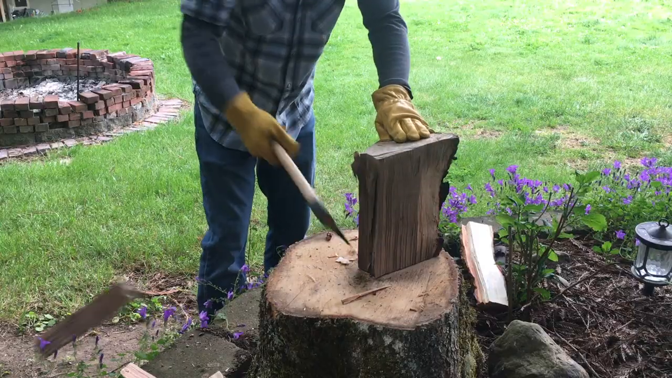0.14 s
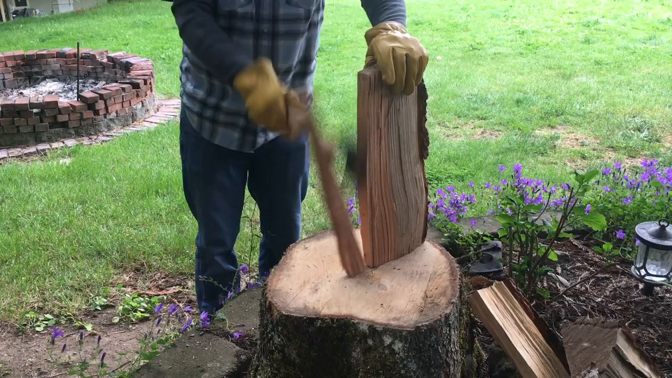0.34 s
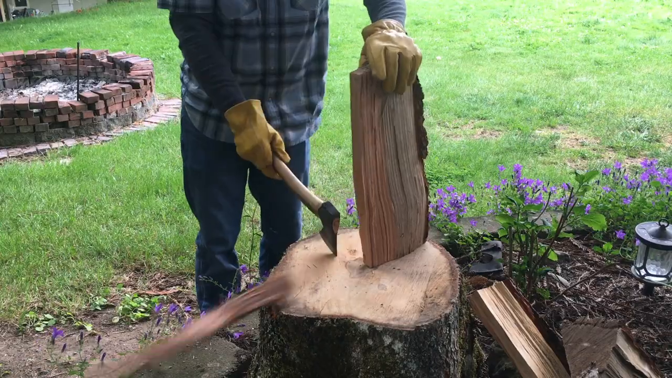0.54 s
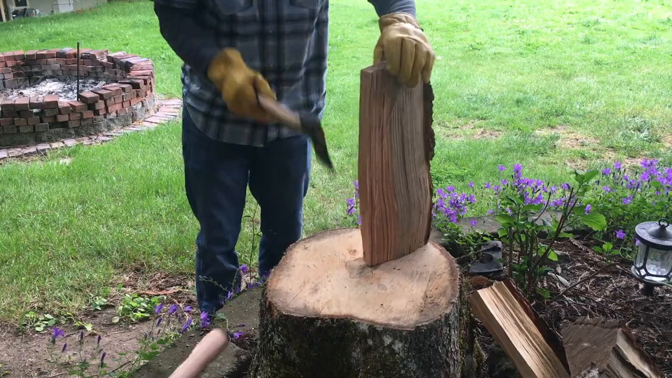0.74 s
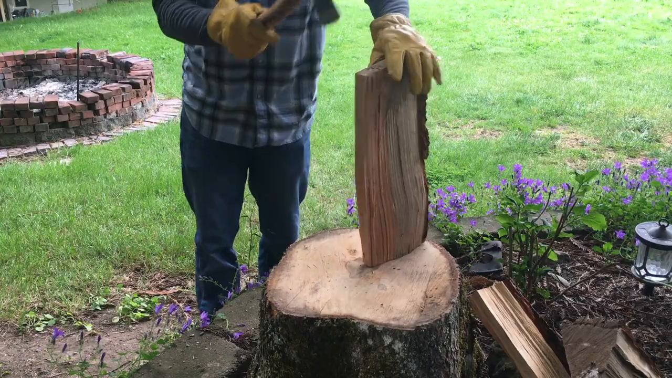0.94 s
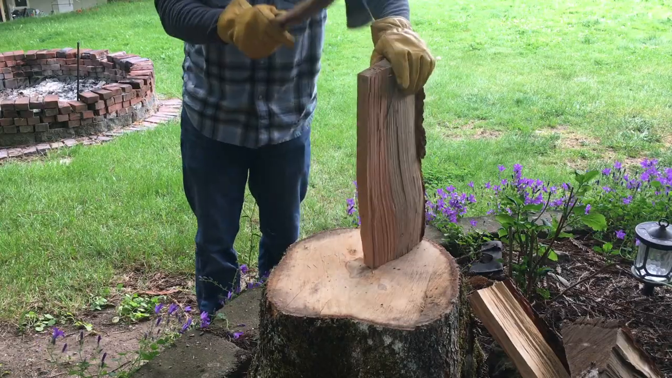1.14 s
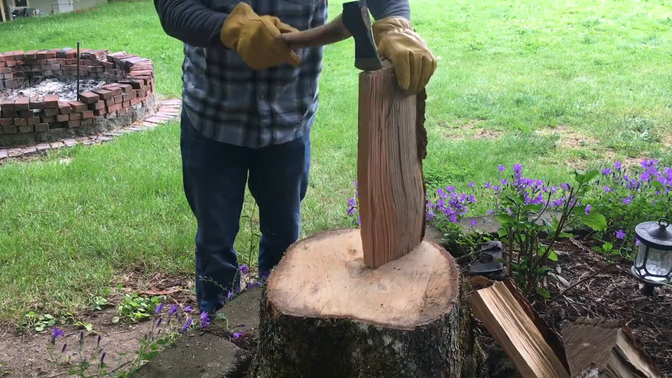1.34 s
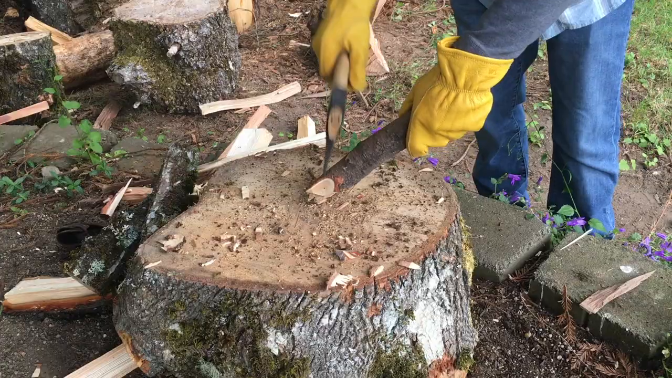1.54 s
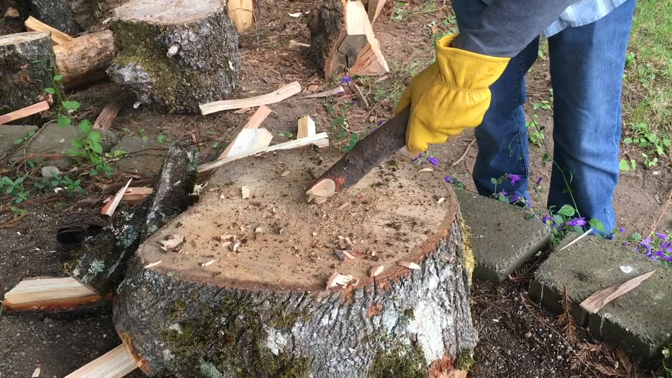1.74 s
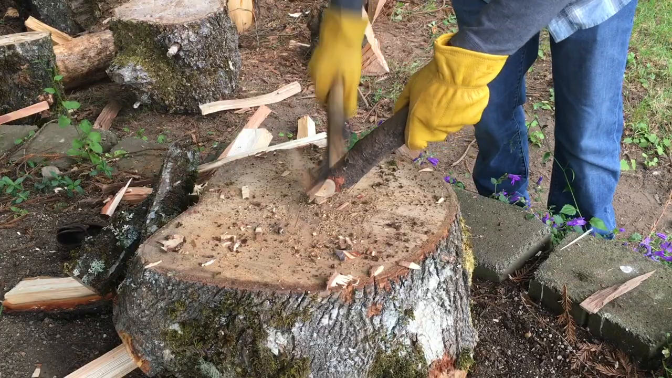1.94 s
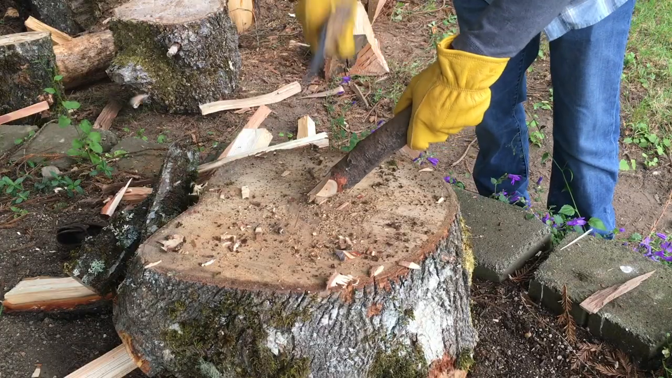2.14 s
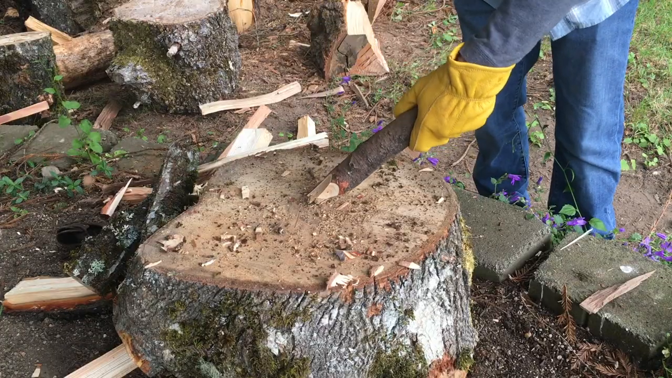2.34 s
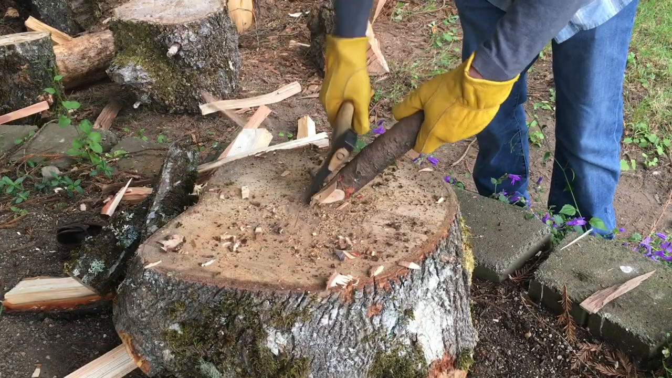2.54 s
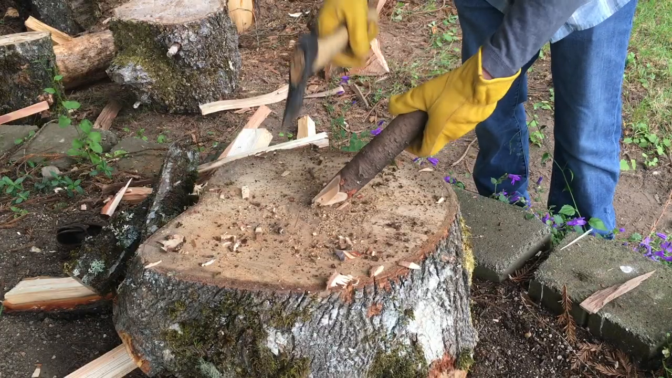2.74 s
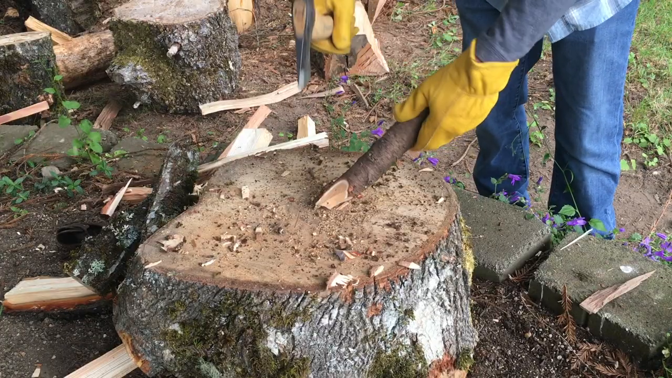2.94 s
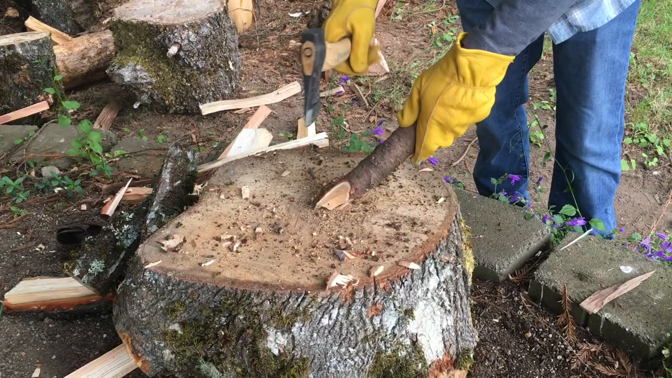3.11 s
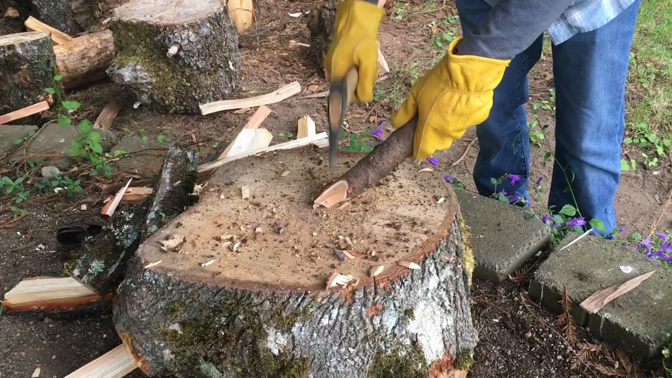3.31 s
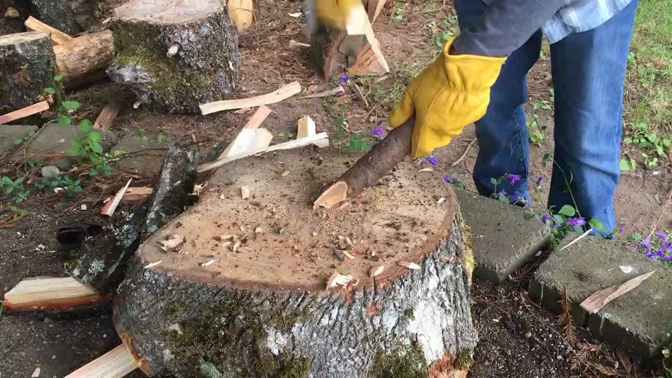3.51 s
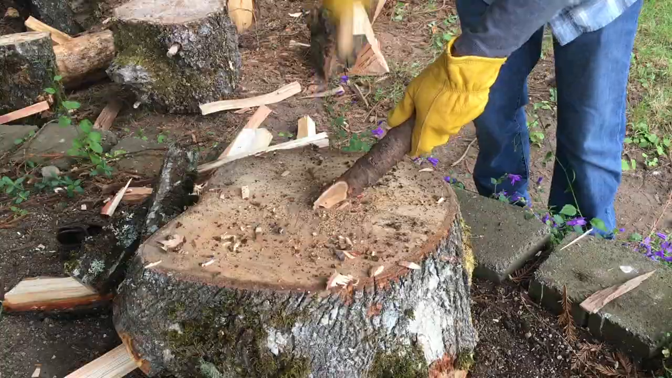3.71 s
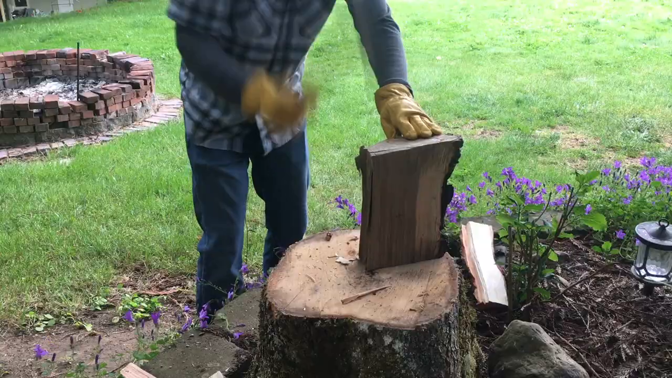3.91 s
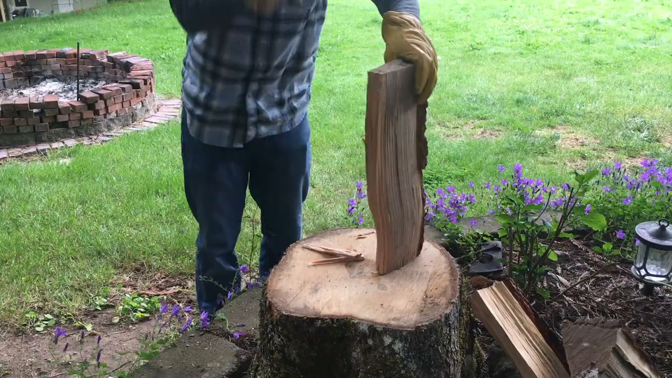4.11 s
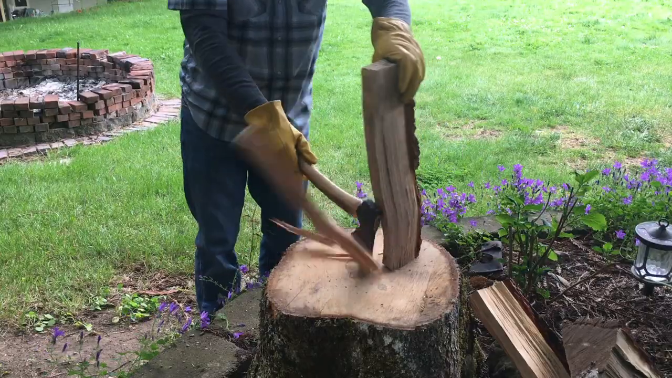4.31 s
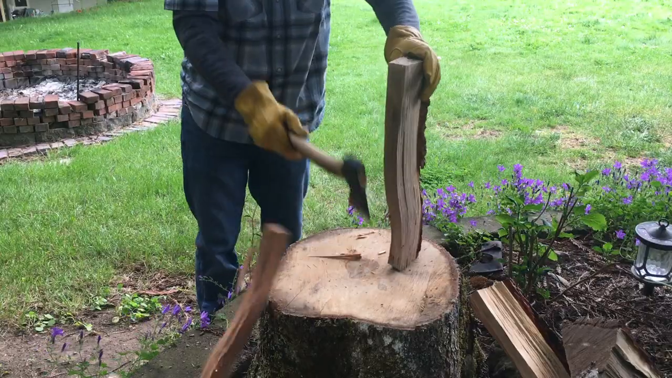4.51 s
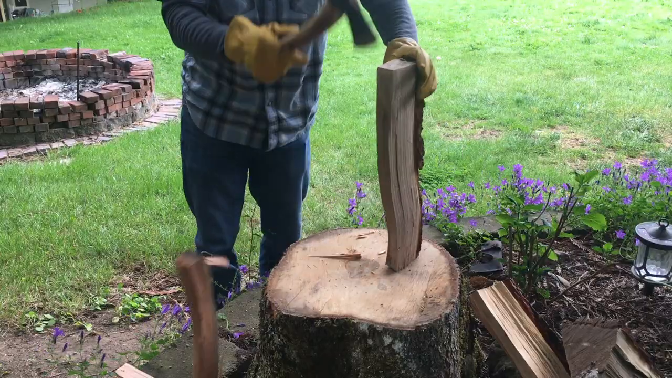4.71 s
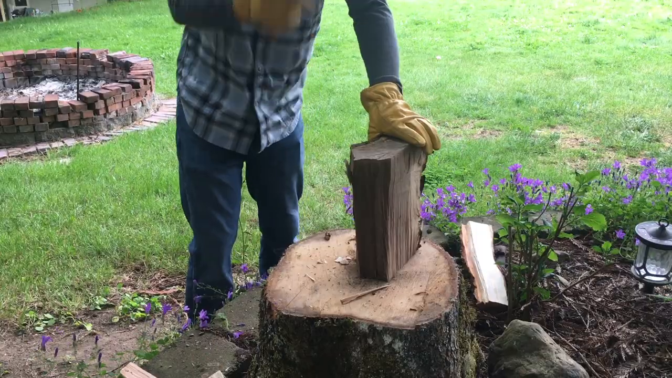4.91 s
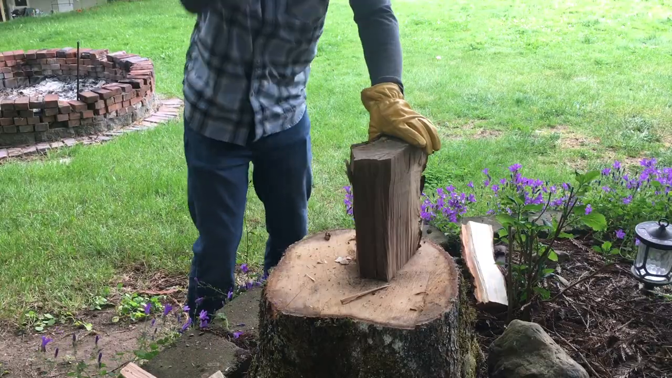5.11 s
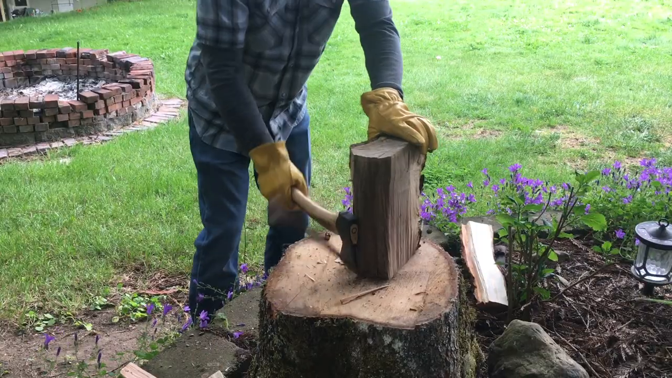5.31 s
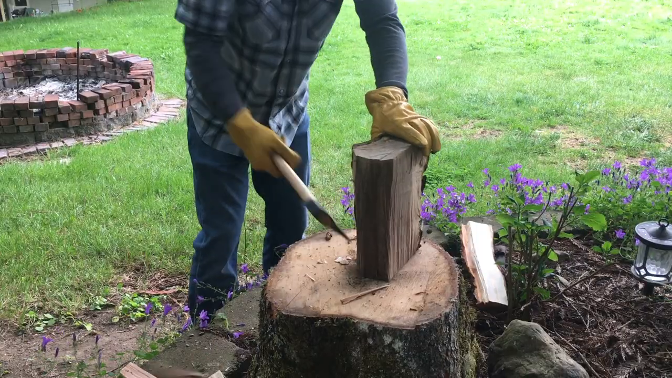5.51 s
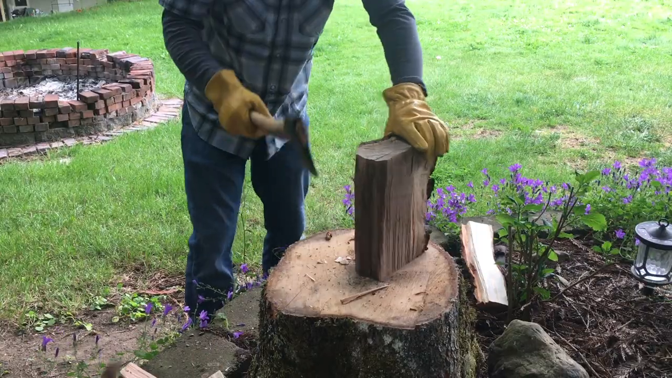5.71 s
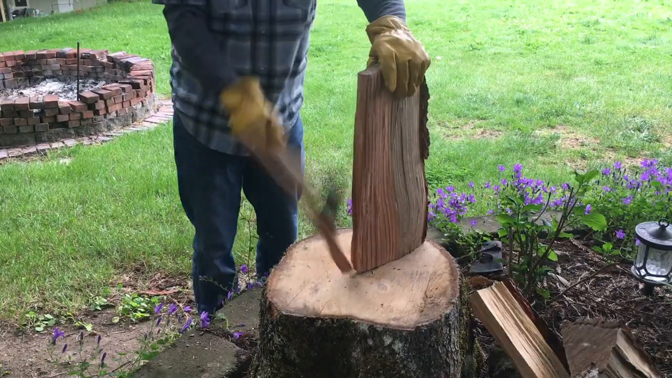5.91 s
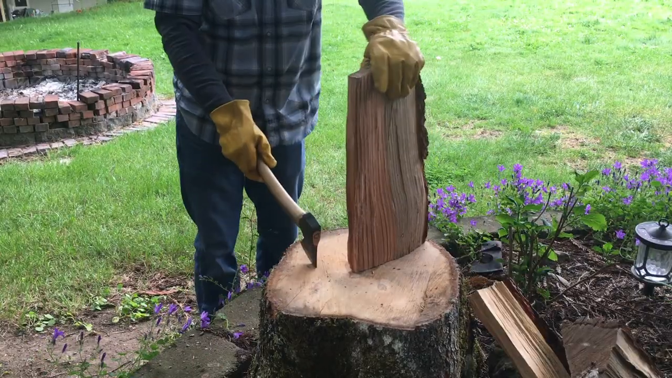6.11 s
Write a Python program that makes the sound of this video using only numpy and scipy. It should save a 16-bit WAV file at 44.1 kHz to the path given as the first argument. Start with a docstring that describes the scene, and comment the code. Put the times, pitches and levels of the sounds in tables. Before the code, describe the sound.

Close outdoors, a hatchet splits kindling on a big stump. A knock and a sharp crack come first, then a split stick bounces woodily. Two tight chops into a branch follow, then quicker splits with clattering sticks, ending on the hardest, brightest crack. Low stump thuds and short yard echoes sit over faint air, distant rumble and a wavering motor hum. One midrange-forward microphone with little deep bass and a softened top.

```python
"""Splitting kindling in a garden

Close by, a hatchet splits kindling on a stump: noise bursts crack and tear, damped sines make the rest,
from the blade's bite and ringing steel to sticks that knock, fall and ring, and the stump's low thuds.
The yard answers the wood with a dying noise echo. Further off lie noise hiss and rumble, a wavering hum
of steady tones, a faint buzz of narrow noise and a bird's two rising whistles, gliding near-sines.
One microphone drops the deep bass, lifts its presence range and cuts the top."""
import sys
import numpy as np
from scipy import signal
from scipy.fft import rfft, irfft
from scipy.io import wavfile
from scipy.ndimage import uniform_filter1d

SR = 44100
rng = np.random.default_rng(int(sys.argv[2]) if len(sys.argv) > 2 else 0)


def store_wav(level_fs):
    """Save 16-bit WAV to argv[1]."""
    pcm = np.round(np.clip(np.atleast_2d(level_fs), -1, 1) * 32767)
    wavfile.write(sys.argv[1], SR, pcm.T.astype(np.int16))


N = 275669

# Fibres snapping, chips and bark scuffing:
# (time [s], hold [ms], fade t60 [ms], level [dB], brightness [dB per band])
CRACKS = [(0.127, 6.1, 10, -39.5, -7.5), (0.193, 3.4, 19, -66.5, -18), (0.4074, 8.1, 14, -20, 7),
          (0.413, 1.2, 81, -28.5, 0.5), (0.497, 5.4, 30, -57.5, -9.5), (0.521, 7.5, 23, -62, -8),
          (0.6997, 12, 64, -32.5, 2.5), (0.918, 27, 6.4, -44.5, -1.5), (0.9268, 2, 28, -31.5, -6),
          (1.066, 3.6, 20, -54, -3), (1.115, 9.5, 18, -52.5, 5), (1.132, 7.5, 6.2, -62, 7),
          (1.15, 2.4, 5, -53, 16), (1.345, 1.3, 25.6, -33.5, -3.5), (1.598, 9, 36, -59.5, 0.5),
          (2.049, 5.2, 9.7, -17.5, 2), (2.061, 1.7, 19, -29, -9), (2.085, 3.7, 46, -47.5, 1.5),
          (2.609, 4.6, 37, -21, 0), (2.622, 4.1, 9.1, -31, -17.5), (2.633, 2.5, 70, -39.5, -7),
          (2.647, 49, 71, -64.5, -14.5), (3.055, 2.6, 16, -58.5, -0.5), (3.089, 3.8, 15, -67, 2.5),
          (3.23, 4.9, 17, -59, 2.5), (3.447, 5.1, 23, -43, 0.5), (3.508, 1.3, 12, -58, -6.5),
          (4.038, 15, 17, -43, -7), (4.0459, 10.7, 48, -28, 4.5), (4.062, 8.1, 29, -39.5, 2),
          (4.077, 0.75, 29, -25.5, -3.5), (4.094, 48, 16, -71, 8.5), (4.288, 5, 19.7, -16, 0.5),
          (4.301, 10.4, 56, -34.5, 2), (4.32, 6.5, 37, -36, 0.5), (4.337, 5, 230, -46, -5),
          (4.368, 2.45, 14, -32.5, 3), (4.542, 3.7, 18, -51.5, -2.5), (4.617, 4, 76, -36.5, -5),
          (4.736, 1.33, 35, -48.5, -4.5), (5.3427, 3.1, 14, -20, 1), (5.349, 12.3, 22, -30.5, 2),
          (5.364, 21, 24, -37, 4), (5.373, 1.2, 10, -40, 1), (5.3805, 2, 20, -37, -4),
          (5.395, 21, 160, -50.5, -4), (5.407, 1.6, 12, -53, 8), (5.574, 4.4, 18, -57, 1),
          (5.622, 33, 12, -54, -1), (5.6404, 5.3, 20, -39.5, 5.5), (5.659, 1.2, 30, -42, 0),
          (5.726, 1.9, 34, -48.5, 4.5), (5.872, 2, 12, -57.5, -5), (5.974, 0.77, 10.3, -10.5, 3.5),
          (5.979, 10.2, 22, -22.5, 0.5), (5.992, 5, 180, -42.5, -3.5), (6.038, 2.3, 19, -29.5, -5),
          (6.222, 22, 37, -54.5, 1)]
# Bands of the cracks, dull to bright: (low edge [Hz], high edge [Hz])
CRACK_BANDS_HZ = [(400, 1500), (1500, 3500), (3500, 7400)]
MIDDLE_DB = -3.5   # middle band against the line from dull to bright

# All blow tables below, from bites to jumps: (time [s], main ring [Hz], peak [dB],
# brightness [dB per octave], focus on the main ring [dB per octave squared], ring length [share of usual])
# All ring tables beside them: (multiple of main ring [ratio], relative level [dB], usual t60 [s])
# The blade bites the piece being split
BITES = [(0.41, 563, -28.5, 5, -1, 1), (2.05, 431, -40, 15, 4.5, 0.67),
         (2.612, 540, -32, -12.5, -4.5, 0.77), (3.449, 631.5, -42, -17, 5, 0.7),
         (4.049, 486.6, -24, -2, -4, 0.89), (4.29, 574, -30, -7, -5.5, 0.81),
         (5.344, 685, -28.5, 4.5, -3, 0.38), (5.985, 530, -31.5, -24.5, 4, 0.59)]
BLOCK_RINGS = [(0.501, -5, 0.059), (0.998, 7, 0.063), (1.32, -11, 0.044), (2.099, -0.5, 0.046),
               (2.95, 6.5, 0.021), (3.9, -11, .025)]
# Blade or wood comes down on the stump's face
LANDINGS = [(0.1277, 880, -11, -1.5, 3.1, 0.3), (0.498, 940, -25.5, -3.5, 0.43, 0.65),
            (0.7015, 1107, -36, -13.5, 0.37, 0.67), (0.927, 1510, -9, 12, 0.59, 0.067),
            (1.122, 492, -55, -12.5, 0.27, 1.9), (1.346, 947, -34.5, -2.5, 0.27, 1.54),
            (1.602, 1100, -52, -12, 0.38, 0.67), (2.064, 838, -26.5, 10, 3, 1.3),
            (2.086, 1110, -29, -1, .3, 0.62), (2.6225, 1460, -10, -1, 2.7, 0.32),
            (2.6335, 1187, -20.5, 3.5, 3.1, 0.97), (4.078, 1297, -20, 6.5, 0.26, 1.14),
            (4.364, 890, -22, -4.5, 0.24, 0.67), (4.736, 1364, -37, -3, 0.3, 0.88),
            (5.388, 1134, -18, 2, .3, 0.61), (5.627, 1450, -51, -14.5, 0.38, 0.36),
            (6.04, 926, -25.5, 5, 1, 2.16), (6.226, 1140, -65, -12.5, 1.5, 0.74)]
FACE_RINGS = [(0.201, -6, 0.023), (0.32, 9, 0.027), (0.441, -8.5, 0.058), (0.548, -7, 0.034),
              (.7, -6.5, 0.049), (0.86, -7, 0.026), (1.0, 4.5, 0.017), (1.11, -16.5, .05),
              (1.8, -11.5, 0.012)]
# The whole log is set down
SET_DOWN = [(0.1275, 949, -39, 0.016, 0.08, 1), (0.196, 1003, -62.5, 0.019, 0.07, 0.52)]
LOG_RINGS = [(1.002, -0.5, 0.13), (2.04, 9.5, 0.061), (2.95, -5, 0.098), (3.37, -7, 0.059)]
# The first split stick flies off and bounces
BOUNCES = [(0.7005, 652, -29, -3, 0, 1.0), (0.928, 660, -37, 5.5, .5, .6)]
STICK_RINGS = [(.47, 11, .04), (.82, 8, .04), (1.0, -1, .2), (1.08, -9, .12), (1.72, 1, .11),
               (2.49, 3, .09), (2.66, 1, .12), (4.25, -4, .06), (4.52, 2, .07), (5.95, 0, .08)]
# Sticks clatter: first the newly split stick as it flies off, later thinner sticks
CLATTER = [(0.421, 650, -69, 36, 10, 1.8), (4.322, 700, -59, 36, 10, .7), (4.339, 700, -63, 36, 10, 1.2),
           (4.543, 705, -52, 0, 30, 3.0), (4.62, 700, -35, 13, 5.5, .75), (4.736, 687, -56, 24, 9, 1.0),
           (5.575, 710, -46, -8, 25, 1.2), (5.621, 730, -81, 34, 10, .6), (5.636, 480, -35, -4, 12, .3),
           (5.642, 810, -60, 34, 10, .45), (5.6585, 605, -50, 10, .8, .8), (5.725, 705, -54, 20, 8, .6),
           (5.856, 340, -40, -6, 12, .7), (5.873, 625, -40, -8, 20, .7), (6.041, 950, -36, -6, 25, .8)]
SLAT_RINGS = [(.5, 4, .03), (1.0, 0, .1), (1.27, -10, .1), (1.49, 1, .09), (2.7, 0, .075), (2.9, -6, .06),
              (4.45, -9, .045), (6.0, -3, .03)]
# The held branch jumps under the blade
JUMPS = [(2.066, 1125, -46, 0, .1, .5), (2.634, 1125, -34, 3, 0, 1.1)]
BRANCH_RINGS = [(.54, -6, .17), (.72, -6, .14), (.87, -3, .16), (1.0, 0, .17), (1.06, -3, .15),
                (1.12, -2, .17)]
# Each ring's extra note while the pieces touch: louder, and a share of the ring's t60
CONTACT_DB, CONTACT_SHARE = 6, .25

# Hard bites that set the steel head ringing: (time [s], peak [dB], ring length [share of usual])
HEAD_BLOWS = [(0.414, -20, 1), (2.05, -23, 1), (2.612, -37.5, 1), (4.049, -28, 1), (4.29, -15, 1),
              (5.3438, -2, .27), (5.975, -28, 1)]
# Rings of the steel head: (pitch [Hz], relative level [dB], usual t60 [s])
HEAD_RINGS = [(3350, 0, .045), (3665, -3, .035), (4260, -9, .025), (5020, -12, .02), (5800, -11, .03)]
# Blows that shake the stump and the ground: (time [s], peak [dB])
THUDS = [(0.132, -27.5), (0.409, -34.5), (0.501, -34), (0.702, -21.5), (0.928, -32), (1.115, -37.5),
         (1.346, -34.5), (2.05, -30.5), (2.087, -39), (2.613, -35), (2.634, -34.5), (4.05, -37.5),
         (4.082, -28), (4.298, -32.5), (4.366, -28.5), (4.625, -31), (4.74, -37), (5.348, -28.5),
         (5.391, -33.5), (5.983, -41.5), (6.04, -23.5)]
# Low rings of the stump: (pitch [Hz], relative level [dB], t60 [s])
STUMP_RINGS = [(62, -9, 0.064), (87.6, -3.5, 0.1), (139.4, 6, 0.042), (214.7, 10.5, 0.024)]

YARD_DB, YARD_T60_S, YARD_CUT_HZ = -27, 0.086, 3200
FAR_DB, FAR_T60_S = -18, 0.87   # later echoes, against the near ones

# Bird, two gliding notes at once: (time [s], length [s], from [Hz], to [Hz], top level [dB],
# loudest point [share of the note])
WHISTLES = [(.61, .09, 3280, 3550, -71, 1.0), (.62, .08, 2310, 2450, -71, 1.0),
            (4.41, .37, 2680, 3850, -64.5, .45), (4.46, .44, 2130, 2700, -64.5, .6)]
SWELL_DB, SWELL_LIMIT_DB = -18, -5   # times the squared share away from the loudest point; lowest drop
GLIDE_EASE = .3   # the glide slows towards its end

# Faint high buzz, perhaps an insect: (from [s], to [s], level [dB])
BUZZ = (1.45, 2.02, -79)
BUZZ_HZ, BUZZ_WIDTH_HZ = 5330, 600   # width of each of two resonances in a row

# Level of the hum as a whole: (time [s], level [dB])
HUM_LEVEL = [(.3, -74), (.6, -61), (1.2, -62), (1.8, -58), (2.2, -64), (2.6, -58), (2.85, -51),
             (3.15, -53.5), (3.4, -63), (3.6, -55.5), (3.83, -50)]
# Tones of the hum: (pitch [Hz], pitch stray [Hz], relative level [dB])
HUM_TONES = [(127.3, 0.37, 1.5), (263, 1.9, -22), (58.3, 11, -12), (143, 0.67, -10.5)]

# Background in three stretches, the hiss falling suddenly quieter at both joins:
# (time [s], hiss [dB], treble of the hiss [dB], rumble [dB])
AIR_LEVELS = [
    [(0.0, -53, 7.5, -59), (0.33, -65, 1, -57.5), (0.45, -47, 1, -62), (0.6, -64.5, 10.5, -53.5),
     (1.33, -63, 1.5, -56.5), (1.95, -62, -3.5, -57.5), (2.2, -64.5, 8.5, -58.5), (2.45, -62.5, 0.5, -54),
     (2.8, -61, 3.5, -61.5), (3.28, -63, -1, -56.5), (3.66, -62.5, -1.5, -56.5), (3.8, -61.5, 5.5, -69.5),
     (4.0, -60.5, -3, -60), (4.19, -59, 10, -58.5)],
    [(4.192, -75.5, 7, -53.5), (4.55, -59, 5, -61.5), (4.8, -66, 5.5, -57), (5.05, -62.5, 0.5, -63.5),
     (5.5, -60.5, 6, -62), (5.892, -59, 2.5, -59.5)],
    [(5.894, -67, 3.5, -56), (6.05, -49, -1.5, -59.5), (6.25, -72, 7.5, -56)],
]
# Spectrum shape of the hiss: (frequency [Hz], relative level [dB per Hz])
HISS_SPECTRUM = [(110, -29.5), (180, -6), (400, -7), (520, -9), (1220, -11), (2700, -16), (3600, -20.5),
                 (5500, -21.5), (7000, -29.5), (8000, -20)]
# Spectrum shape of the rumble: (frequency [Hz], relative level [dB per Hz])
RUMBLE_SPECTRUM = [(15, -50), (25, -18.5), (43, -13), (49, -1), (70, 2.5), (177, -6), (210, -28.5),
                   (260, -12), (340, -51.5), (570, -120)]

MIC_LOW_HZ, CUTOFF_HZ, SELF_NOISE_DB = 47, 7270, -100
MIC_PEAK_HZ, MIC_PEAK_WIDTH_HZ = 3600, 420
MIC_PEAK_ADDED_DB = -3.5   # level of the resonance mixed in with the straight sound
OVERLOAD = 0.54   # ceiling of the soft squeeze, full scale being 1


def amp(db):
    """Decibels to gain."""
    return 10 ** (np.asarray(db) / 20)


def rms_one(x):
    """Scale to unit rms."""
    return x / np.sqrt(np.mean(x ** 2) + 1e-20)


def in_time(rows, outside=None):
    """Columns of a curve table, one value per sample."""
    s, *columns = np.transpose(rows)
    t = np.arange(N) / SR
    return [np.interp(t, s, column, outside, outside) for column in columns]


def drift(rate_hz):
    """Slow random wandering of spread 1: noise through two equal low-pass poles."""
    step = 40   # computed at every 40th sample, joined by lines
    r = np.exp(-2 * np.pi * rate_hz * step / SR)
    noise = rng.standard_normal(N // step + 2002)
    slow = signal.lfilter([1], [1, -2 * r, r * r], noise)[2000:]   # skip the settling
    return np.interp(np.arange(N) / step, np.arange(len(slow)), rms_one(slow))


def coloured(spectrum):
    """Noise of rms 1 with the given spectrum."""
    hz, level_db = np.transpose(spectrum)
    grid_hz = np.maximum(np.arange(N // 2 + 1) * SR / N, 1)
    gain = amp(np.interp(np.log(grid_hz), np.log(hz), level_db))
    return rms_one(irfft(rfft(rng.standard_normal(N)) * gain, N))


def add(out, s, piece):
    """Mix a short sound in at time s."""
    at = round(s * SR)
    out[at:at + len(piece)] += piece[:N - at]


def butter(x, order, edge_hz, kind="low"):
    """A Butterworth filter, run forwards."""
    return signal.sosfilt(signal.butter(order, edge_hz, kind, fs=SR, output="sos"), x)


def resonance(x, hz, width_hz):
    """A two-pole resonance with gain 1 on top."""
    r = np.exp(-np.pi * width_hz / SR)
    zeros = (1 - r * r) / 2 * np.array([1, 0, -1])
    return signal.lfilter(zeros, [1, -2 * r * np.cos(2 * np.pi * hz / SR), r * r], x)


def mode(hz, level_db, t60, rise_cycles):
    """One damped ring; the contact needs about a cycle to build it up."""
    t = np.arange(SR // 3) / SR
    dying = amp(level_db - 60 * t / max(t60, .004))
    rise = (1 - np.exp(-t * hz / rise_cycles)) ** 2
    return dying * rise * np.sin(2 * np.pi * hz * t)


def cracks(grain_db, grain_ms):
    """Each crack is a burst of uneven snaps: it starts at once, holds while the split runs, then dies."""
    ms = np.arange(SR // 8) * 1000 / SR
    lumps, *noises = rng.standard_normal((len(CRACKS), 4, len(ms))).swapaxes(0, 1)
    width = max(round(grain_ms * SR / 1000), 1)
    lumps = uniform_filter1d(lumps, width, axis=1) * np.sqrt(width)
    # some fibres let go harder than others
    force = amp(grain_db * lumps) / np.sqrt(np.mean(amp(2 * grain_db * lumps)))
    s, hold, fade, level_db, bright_db = np.array(CRACKS).T[:, :, None]
    band_db = level_db - bright_db, level_db + MIDDLE_DB, level_db + bright_db
    start = np.clip(ms / 0.34, 0, 1)
    shape = start * amp(-60 * np.maximum(ms - hold, 0) / np.maximum(fade, 1))
    out = np.zeros(N)
    for edges_hz, db, noise in zip(CRACK_BANDS_HZ, band_db, noises):
        share = (edges_hz[1] - edges_hz[0]) / (SR / 2)   # evens out the bands' widths
        bursts = butter(noise * force * shape, 2, edges_hz, "band") * amp(db) / np.sqrt(share)
        for at, piece in zip(s[:, 0], bursts):
            add(out, at, piece)
    return out


def knocks(blows, rings, tumble_db=1.5):
    """Every blow rings all modes of the piece, each with a short, louder, slightly mistuned contact note."""
    out = np.zeros(N)
    tumble = amp(tumble_db * drift(24))   # the ring swells and dips
    luck = rng.normal(0, 1, (len(blows), len(rings), 2)) * [.05, 1.5]   # mistuning (share), level (dB)
    for (s, main_hz, peak_db, bright_db, focus_db, length), draws in zip(blows, luck):
        for (multiple, ring_db, usual_t60), (apart, extra_db) in zip(rings, draws):
            octaves = np.log2(multiple)
            hz, t60 = main_hz * multiple, usual_t60 * length
            db = peak_db + ring_db + bright_db * octaves - focus_db * octaves ** 2 + extra_db
            ring = mode(hz, db, t60, rise_cycles=0.7)
            contact = mode(hz * (1 + apart), db + CONTACT_DB, CONTACT_SHARE * t60, rise_cycles=0.5)
            add(out, s, ring + contact)
    return butter(out * tumble, 2, 110, "high")


def bites():
    """The piece being split rings under the blade, damped within tens of milliseconds."""
    return knocks(BITES, BLOCK_RINGS)


def head():
    """The hatchet's steel rings briefly at fixed pitches."""
    out = np.zeros(N)
    for s, peak_db, length in HEAD_BLOWS:
        for hz, ring_db, t60 in HEAD_RINGS:
            add(out, s, mode(hz, peak_db + ring_db, t60 * length, rise_cycles=2.2))
    return out


def landings():
    """Blade or wood lands on the stump's face, which knocks in many closely spaced modes."""
    return knocks(LANDINGS, FACE_RINGS)


def log_set_down():
    """The whole log is set down and rings in a few wide-spaced modes."""
    return knocks(SET_DOWN, LOG_RINGS)


def stick_bounces():
    """The first split stick bounces and rings, its modes spread over several octaves."""
    return knocks(BOUNCES, STICK_RINGS)


def clatter():
    """Sticks knock and ring on modes spread over several octaves: the first split stick as it flies off, then
    thinner ones."""
    return knocks(CLATTER, SLAT_RINGS)


def branch_jumps():
    """The held branch rings thickly on crowded, slowly dying modes."""
    return knocks(JUMPS, BRANCH_RINGS)


def thuds():
    """Each blow sets the stump's low modes going, with strengths of its own."""
    out = np.zeros(N)
    luck = rng.normal(0, 2.2, (len(THUDS), len(STUMP_RINGS)))
    for (s, peak_db), draws in zip(THUDS, luck):
        for (hz, ring_db, t60), extra_db in zip(STUMP_RINGS, draws):
            add(out, s, mode(hz, peak_db + ring_db + extra_db, t60, rise_cycles=0.22))
    return butter(out, 2, 55, "high")


def yard(x):
    """Scattered echoes off walls, trees and ground: a dull, dying noise response with a longer, fainter tail."""
    t = np.arange(SR) / SR
    dying = amp(-60 * t / YARD_T60_S) + amp(FAR_DB - 60 * t / FAR_T60_S)
    echoes = rng.standard_normal(len(t)) * dying * np.clip(t / 0.0022, 0, 1)
    echoes = butter(echoes, 1, YARD_CUT_HZ)
    echoes = echoes / np.sqrt(np.sum(echoes ** 2))
    return amp(YARD_DB) * signal.fftconvolve(x, echoes)[:N]


def whistle(s, length, from_hz, to_hz, top_db, loudest):
    """A bird's near sine that glides up and swells, fluttering in level and pitch."""
    t = np.arange(N) / SR - s
    along = np.clip(t / length, 0, 1)
    edges = np.clip(np.minimum(t, length - t) / 0.016, 0, 1)
    swell_db = np.maximum(SWELL_DB * (along - loudest) ** 2, SWELL_LIMIT_DB)
    glide_hz = from_hz + (to_hz - from_hz) * along * (1 + GLIDE_EASE * (1 - along))
    turns = np.cumsum(glide_hz * (1 + .011 * drift(130))) / SR
    level = edges * amp(swell_db) * amp(top_db + 2.0 * drift(45))
    return np.sqrt(2) * level * np.sin(2 * np.pi * turns)


def buzz():
    """A narrow band of flickering noise, made by two equal resonances in a row."""
    band = resonance(rng.standard_normal(N), BUZZ_HZ, BUZZ_WIDTH_HZ)
    band = resonance(band, BUZZ_HZ, BUZZ_WIDTH_HZ)
    start, end, level_db = BUZZ
    t = np.arange(N) / SR
    edges = np.clip(np.minimum(t - start, end - t) / 0.035, 0, 1)
    return rms_one(band) * edges * amp(level_db + 2.9 * drift(25))


def hum():
    """A far motor: steady tones whose pitch strays a little and whose level wavers."""
    out = np.zeros(N)
    for hz, stray_hz, level_db in HUM_TONES:
        turns = np.cumsum(hz + stray_hz * drift(2.7)) / SR
        out += np.sqrt(2) * amp(level_db + 1.4 * drift(4.45)) * np.sin(2 * np.pi * turns)
    return out * amp(in_time(HUM_LEVEL, outside=-120)[0])


def air():
    """Leaves and far traffic: hiss whose treble comes and goes, over a lumpy rumble."""
    hiss_db, treble_db, rumble_db = in_time(np.concatenate(AIR_LEVELS))
    hiss = coloured(HISS_SPECTRUM)
    # filtered both ways, so that the rest is the treble alone
    dull = signal.sosfiltfilt(signal.butter(2, 2500, fs=SR, output="sos"), hiss)
    treble = amp(treble_db + 1.2 * drift(14)) * (hiss - dull)
    hiss = (dull + treble) * amp(hiss_db + 0.78 * drift(31))
    rumble = coloured(RUMBLE_SPECTRUM) * amp(rumble_db + 0.5 * drift(2.7))
    return hiss + rumble


def scene():
    """Close wood and steel with their echoes, over the distant background."""
    wood = cracks(grain_db=5.5, grain_ms=0.8) + bites() + head() + landings()
    wood += log_set_down() + stick_bounces() + clatter() + branch_jumps()
    bird = sum(whistle(*row) for row in WHISTLES)
    background = bird + buzz() + hum() + air()
    return (wood + thuds() + yard(wood) + background)[None]


def record(dry):
    """The microphone drops deep bass and lifts its presence; a steep top cut, then faint converter noise."""
    thin = butter(dry, 3, MIC_LOW_HZ, "high")
    presence = resonance(thin, MIC_PEAK_HZ, MIC_PEAK_WIDTH_HZ)
    bright = thin + amp(MIC_PEAK_ADDED_DB) * presence
    rounded = OVERLOAD * np.tanh(bright / OVERLOAD)   # the loudest peaks are squeezed
    cut = signal.sosfilt(signal.cheby2(16, 50, CUTOFF_HZ, fs=SR, output="sos"), rounded)
    return cut + amp(SELF_NOISE_DB) * rng.standard_normal(dry.shape)


dry = scene()
out = record(dry)
store_wav(out)
```